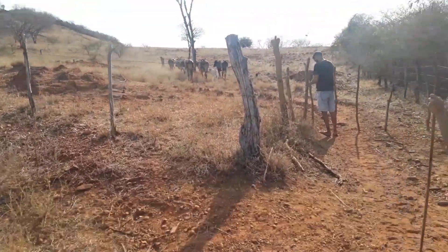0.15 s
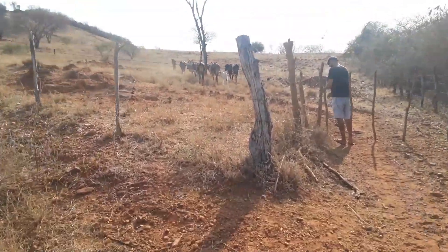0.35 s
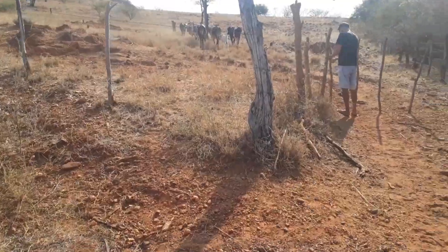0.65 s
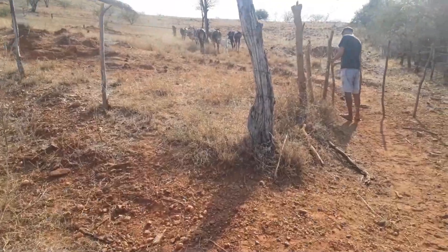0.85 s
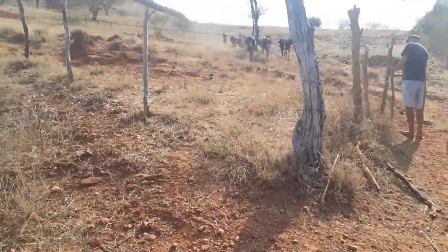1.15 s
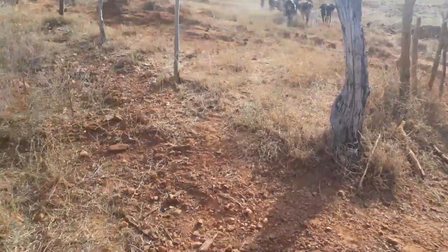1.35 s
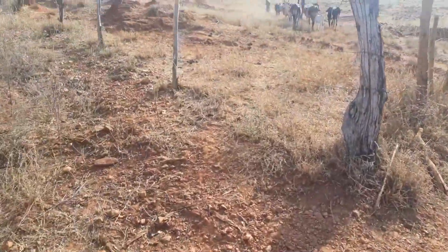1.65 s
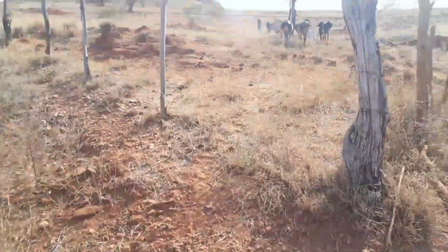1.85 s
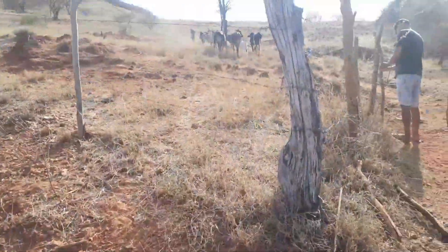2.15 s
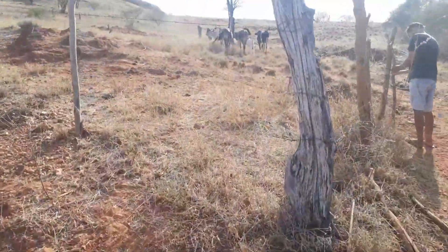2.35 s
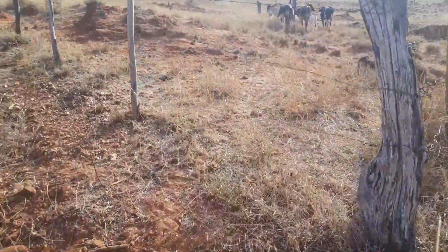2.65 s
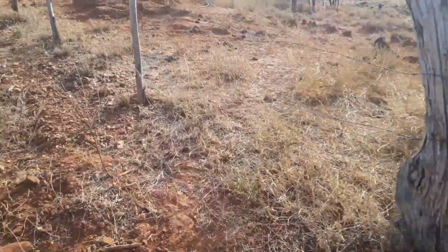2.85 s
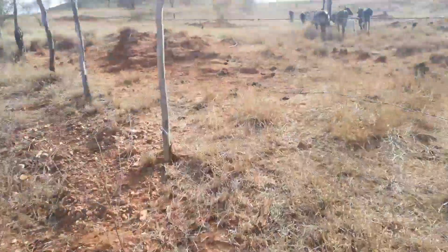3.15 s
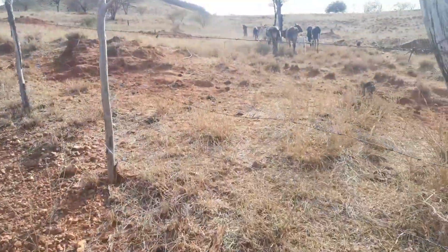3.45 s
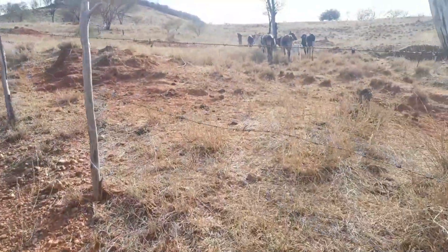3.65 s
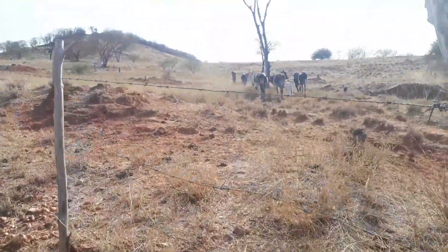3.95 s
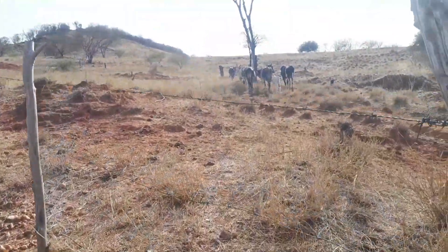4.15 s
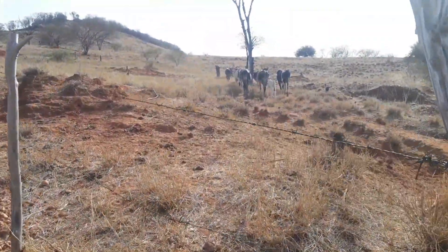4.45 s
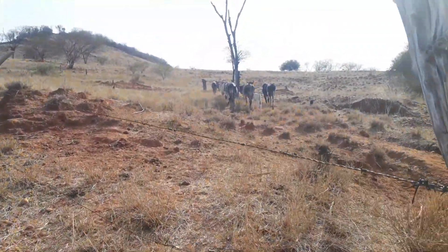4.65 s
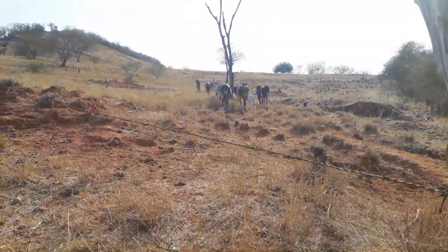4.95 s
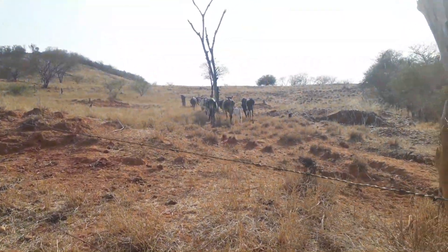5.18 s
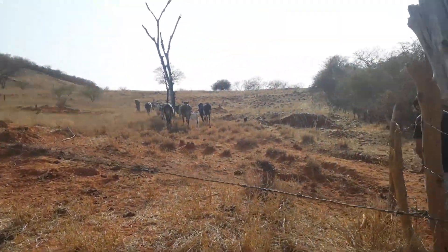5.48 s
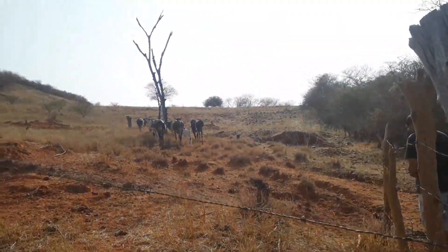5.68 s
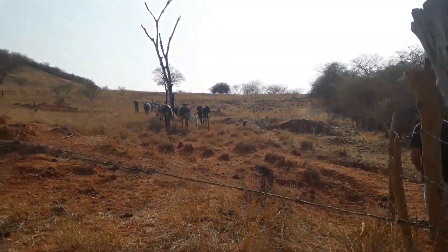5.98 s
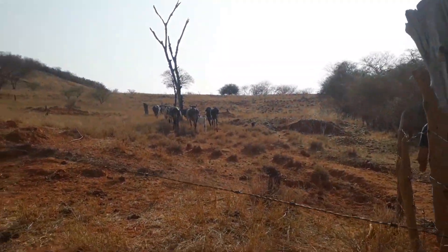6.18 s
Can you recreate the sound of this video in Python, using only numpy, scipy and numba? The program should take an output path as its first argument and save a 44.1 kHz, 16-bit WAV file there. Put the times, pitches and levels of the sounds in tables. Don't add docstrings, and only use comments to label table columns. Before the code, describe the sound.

Outdoors on a dry pasture, feet crunch straw and grit close to a hand-held phone, with wind puffs thumping it. After a quick sniff of breath, a cow starts a low nasal hum, cracks into a loud hoarse roar, then sinks to a groan. Stalks snap and twigs knock throughout; afterward only small crunches and faint ticks remain over a very faint hiss.

```python
import sys
import numpy as np
from scipy import signal
from scipy.fft import rfft, irfft
from scipy.io import wavfile
from scipy.ndimage import uniform_filter1d
from numba import njit

SR = 44100
rng = np.random.default_rng(int(sys.argv[2]) if len(sys.argv) > 2 else 0)


def volts_from_db(level):
    exponent = np.asarray(level, float) / 20
    return 10 ** exponent


def to_wav(sig):
    pcm = np.clip(np.atleast_2d(sig), -1, 1) * 32767
    pcm = np.round(pcm).astype(np.int16)
    wavfile.write(sys.argv[1], SR, pcm.T)


N = 278712


def unit(x):
    return x / np.sqrt(np.mean(x ** 2))


def track(table):
    s, *columns = np.transpose(table)
    return [np.interp(np.arange(N) / SR, s, c) for c in columns]


def ramp(span_s, start, end):
    return np.interp(np.arange(N) / SR, span_s, [start, end])


def gate(table, fade_s=.02):
    t = np.arange(N) / SR
    inside_s = np.minimum(t - table[0][0], table[-1][0] - t)
    return np.clip((inside_s + fade_s) / fade_s, 0, 1)


@njit
def svf(x, hz, width):
    y, b, l = np.empty(len(x)), 0., 0.
    for i in range(len(x)):
        g, k = np.tan(np.pi * hz[i] / SR), width[i] / hz[i]
        v = (b + g * (x[i] - l)) / (1 + g * (g + k))
        b, l, y[i] = 2 * v - b, l + 2 * g * v, k * v
    return y


def band(x, hz, width_hz):
    hz, width_hz = np.full(len(x), 1.) * hz, np.full(len(x), 1.) * width_hz
    return svf(svf(x, hz, width_hz), hz, width_hz)


def sway(hz, width_hz):
    return unit(band(rng.standard_normal(N), hz, width_hz))


def colour(x, spectrum):
    hz, db = np.transpose(spectrum)
    f = np.maximum(np.arange(N // 2 + 1) * SR / N, 1)
    return unit(irfft(rfft(x) * volts_from_db(np.interp(np.log(f), np.log(hz), db)), N))


def steady(x, span_s=.12):
    return x / np.sqrt(uniform_filter1d(x ** 2, int(span_s * SR)) + 1e-12)


def decay(x, tail_s):
    return signal.lfilter([1], [1, -np.exp(-1 / (tail_s * SR))], x)


def grains(rate_hz, spread_db, tail_s):
    size = (rng.random(N) < rate_hz / SR) * volts_from_db(spread_db * rng.exponential(size=N))
    return decay(size, tail_s) * rng.standard_normal(N)


def bursts(events, floor_db):
    t = np.arange(0, N / SR, 1 / 2000)
    power = volts_from_db(2 * floor_db)
    for s, db, rise_s, fall_s in events:
        drop_db = 20 * np.maximum((s - t) / rise_s, (t - s) / fall_s)
        power = power + volts_from_db(2 * (db - drop_db))
    return np.interp(np.arange(N) / SR, t, np.sqrt(power))


def ticks(events, sharp, tone):
    out, n = np.zeros(N + SR), 6000
    t = np.arange(n) / SR
    for s, db, hz, t60_s in events:
        hit = rng.standard_normal(n) * np.exp(-np.log(1000) * t / max(t60_s, .004))
        hit[0] += tone
        ring = band(hit, min(hz, .4 * SR), hz / sharp)
        start = int(s * SR)
        out[start:start + n] += volts_from_db(db) * ring / np.abs(ring).max()
    return out[:N]


def field():
    # Hz, dB per Hz
    hiss = [(24, -26), (70, -21), (200, -3), (585, 1.5), (800, -4), (1680, 0), (4570, -22), (16000, -37)]
    return colour(rng.standard_normal(N), hiss) * volts_from_db(-65)


def inhale():
    # time in seconds, level in dB
    breath = [
        (0.0, -51),
        (0.226, -50),
        (0.298, -43.5),
        (0.432, -65),
        (0.47, -66),
    ]
    # Hz, width in Hz, level in dB
    nostril = [(556, 190, -0.5), (1580, 107, 8.5), (2090, 134, 6), (2940, 47, 1), (3730, 500, -4),
               (6450, 180, -11.5)]
    air = rng.standard_normal(N)
    passages = sum(volts_from_db(db) * band(air, hz, 3.4 * width_hz) for hz, width_hz, db in nostril)
    return unit(passages) * volts_from_db(track(breath)[0] + 2.5) * gate(breath)


def stalks():
    # Hz, dB per Hz
    straw = [(1470, -31), (2500, 1.5), (3630, -2), (5970, -3), (8800, -0.5), (10700, -8.5), (14800, -6),
             (16000, -9)]
    # peak in seconds, level in dB, rise and fall in seconds per 20 dB
    rustles = [(.32, -46, .15, .022), (.42, -61.5, .1, .08), (.53, -61, .065, .7), (.74, -52, .07, .09),
               (.92, -54.5, .3, .08), (1.05, -54, .25, .04), (1.14, -52, .045, .5), (1.37, -51, .18, .035),
               (1.54, -59, .6, .05), (1.56, -43.5, .015, .04), (1.59, -54, .03, .15),
               (2.06, -62.5, .8, .13), (2.2, -46.5, .05, .085), (2.37, -63, .05, .2),
               (2.57, -60.5, .12, .2), (2.78, -52, .065, .04), (2.87, -58.5, .07, .24),
               (3.26, -56.5, .22, .025), (3.3, -66, .05, 2), (3.63, -47.5, .06, .02),
               (3.65, -58.5, .03, .7), (4.92, -64.5, 6, .06), (5.05, -59, .2, .09), (4.97, -61, .03, .06),
               (5.15, -63, .03, .2), (5.34, -66, .07, .1), (5.44, -62, .06, .04), (5.51, -63, .03, .4),
               (5.79, -59, .17, .055), (5.92, -61, .06, .05), (5.985, -59, .05, .04), (5.85, -68, .1, .3),
               (6.12, -68, .12, 1.5)]
    crackle = grains(700, 3.35, 0.0023) + 0.89 * rng.standard_normal(N)
    flicker_db = 1.4 * sway(6, 12)
    return steady(colour(crackle, straw), span_s=0.061) * bursts(rustles, -82) * volts_from_db(2.8 + flicker_db)


def grit():
    # peak in seconds, level in dB, rise and fall in seconds per 20 dB
    crunches = [(.86, -62, .8, .05), (.878, -48.5, .02, .27), (1.076, -54, .03, .015),
                (1.54, -59, 1.2, .05), (1.562, -41, .016, .04), (1.62, -45, .025, .04),
                (4.49, -47, .06, .1), (4.85, -51, .02, .05), (5.034, -50.5, .006, .11),
                (5.91, -54, .03, .07), (6.282, -72, .05, .15)]
    grinding = grains(530, 2.9, 0.0021) + .8 * rng.standard_normal(N)
    return steady(band(grinding, 1000, 2280), span_s=0.12) * bursts(crunches, -80) * volts_from_db(2.1)


def knocks():
    # start in seconds, peak in dB, centre in Hz, t60 in seconds
    struck = [(0.197, -33.5, 2090, 0.035), (0.318, -31, 1480, 0.037), (0.417, -42.5, 1950, 0.053),
              (0.594, -41, 1720, 0.021), (0.796, -39, 630, 0.045), (0.878, -32, 1510, 0.034),
              (0.966, -38.5, 576, 0.066), (1.073, -36.5, 2900, 0.019), (1.503, -40, 2170, 0.04),
              (1.555, -39, 1130, 0.033), (1.562, -33, 2650, 0.034), (1.612, -39, 1800, 0.078),
              (1.833, -34, 2500, 0.033), (2.214, -31, 1800, 0.055), (2.17, -37, 550, .15),
              (2.21, -35, 550, .15), (1.234, -42, 2500, .03), (5.745, -48, 2500, .02),
              (2.779, -25, 800, 0.04), (2.773, -33, 700, .03), (4.465, -32.5, 611, 0.05),
              (4.498, -32, 800, 0.12), (4.824, -38, 1167, 0.045), (4.964, -42.5, 805, 0.026),
              (5.051, -41, 1200, 0.04), (5.263, -39.5, 1210, 0.022), (5.557, -39.5, 1650, 0.023),
              (5.891, -43.5, 2300, 0.027), (5.956, -41.5, 1580, 0.09), (6.161, -46, 1300, 0.044),
              (6.265, -52, 1520, 0.024), (6.2825, -34, 1000, 0.02)]
    return ticks(struck, sharp=0.76, tone=2.8)


def snaps():
    # start in seconds, peak in dB, centre
    # in Hz
    snapping = [(.1984, -36, 4200), (.3183, -23.5, 8900), (.5176, -37, 6770), (.5796, -41.5, 7660),
                (.62, -40, 5160), (.7123, -38, 10500), (.9136, -39, 4750), (.9964, -36.5, 4930),
                (1.0386, -34, 7160), (1.1129, -43, 7470), (1.1957, -35, 8750), (1.235, -33, 8100),
                (1.5623, -34, 4100), (1.954, -35, 4430), (1.972, -35, 4160), (2.0255, -36, 4000),
                (2.1847, -24, 4360), (2.207, -29, 4510), (2.7548, -35, 4440), (2.7798, -35, 6610),
                (2.8723, -41, 8995), (2.9587, -40, 4110), (3.1655, -36.5, 7220), (3.226, -40, 6100),
                (3.4465, -41, 5670), (3.6069, -35.5, 4353), (3.6207, -35.5, 9505), (3.741, -42, 8753),
                (4.2816, -34.5, 8890), (1.1223, -38, 7300), (1.803, -42, 6000), (2.068, -38, 6000),
                (2.1296, -40, 4500), (2.172, -31, 4380), (2.563, -40, 3330), (2.636, -43, 4460),
                (2.7646, -33, 4460), (3.459, -42, 9500), (3.775, -40, 5000),
                (5.1488, -37.5, 8100), (5.3173, -49, 14200), (5.3374, -44, 7380), (5.421, -43, 13800),
                 (5.5573, -42, 4230), (5.6244, -45, 4040), (5.7453, -41, 14600), (5.781, -32, 12000),
                 (6.1617, -42, 7350), (6.2827, -44.5, 8000),
                (4.914, -41, 7000), (4.922, -40, 6000), (4.994, -45, 7780), (5.065, -41, 1280),
            (5.083, -43, 1280), (5.109, -46, 1170), (5.183, -45, 1680), (5.286, -51, 1360),
            (5.357, -48, 1760), (5.438, -45, 14100), (5.496, -49, 3020), (5.521, -46, 13000),
            (5.587, -49, 11000), (5.67, -50, 3350), (5.717, -50, 11000), (5.801, -43, 5000),
            (5.914, -44, 1070), (5.984, -46, 11000), (6.213, -51, 4000)]
    t60_s = .013
    return ticks([(*row, t60_s) for row in snapping], sharp=1.0, tone=1.9)


def wind():
    # peak in seconds, level in dB, rise and fall in seconds per 20 dB
    gusts = [(.4, -32.5, .13, .055), (.78, -52, .05, .18), (.92, -47, .17, .1), (1.09, -45, .2, .05),
             (1.21, -44, .08, .04), (1.32, -46, .06, .065), (1.43, -48.5, .1, .9), (2.08, -36, .19, .07),
             (2.2, -50, .2, 3), (2.8, -43, .1, .45), (3.65, -45, .1, .1), (4.06, -47, 4, .07),
             (4.3, -52, .1, .09), (4.55, -50, .07, .4), (6.04, -59, .45, .04), (6.14, -63, .05, .15),
             (6.28, -41, .016, .07)]
    # start in seconds, peak in dB, Hz, t60 in seconds
    puffs = [(0.288, -40, 96.9, 0.08), (0.335, -38, 290, 0.06), (0.355, -30, 190, 0.08),
             (0.378, -21, 117, 0.038), (0.417, -27.5, 118, 0.074), (0.764, -41.5, 85, 0.072),
             (0.915, -31, 86.1, 0.051), (1.125, -31, 83.4, 0.043), (1.157, -31, 86.1, 0.042),
             (1.205, -30, 95, 0.05), (0.8, -42, 85, 0.05), (1.294, -33.5, 70.0, 0.054),
             (1.324, -38, 75.4, 0.048), (2.049, -63, 170, 0.057), (2.789, -31.5, 84.5, 0.094),
             (2.851, -27, 194, 0.073), (6.133, -48, 90, 0.24), (6.147, -32.5, 74.4, 0.039),
             (6.189, -46, 86.1, 0.054), (6.285, -32, 94.2, 0.05)]
    turbulence = steady(band(rng.standard_normal(N), 92, 120), span_s=0.072)
    rumble = turbulence * bursts(gusts, -80) * volts_from_db(-6.5)
    out, u = np.zeros(N + SR), np.arange(SR // 3) / SR
    for s, db, hz, t60_s in puffs:
        swell = (1 - np.exp(-u / 0.0021)) * np.exp(-np.log(1000) * u / max(t60_s, .01))
        out[int(s * SR):][:len(u)] += volts_from_db(db) * np.sin(2 * np.pi * hz * u) * swell
    return rumble + out[:N]


def birds():
    # start in seconds, length in seconds, from Hz, to Hz, level in dB
    chirps = [
        (1.465, .025, 3000, 3350, -55),
        (4.701, .037, 2700, 4450, -49),
    ]
    out, t = 0, np.arange(N) / SR
    flutter = volts_from_db(4 * sway(160, 160))
    for s, length_s, hz0, hz1, db in chirps:
        u = np.clip((t - s) / length_s, 0, 1)
        hz = hz1 + (hz0 - hz1) * np.exp(-u / .2)
        swell = np.sqrt(np.abs(np.sin(np.pi * u)))
        out = out + volts_from_db(db) * swell * flutter * np.sin(2 * np.pi * np.cumsum(hz) / SR)
    lag = np.arange(SR // 6) / SR
    hedge = rng.standard_normal(len(lag)) * np.exp(-lag / .03)
    hedge = hedge / np.sqrt(np.sum(hedge ** 2))
    return out + volts_from_db(-8) * signal.fftconvolve(out, hedge)[:N]


def folds(hz, jitter):
    phase = np.cumsum(hz) / SR
    at = np.interp(np.arange(1, int(phase[-1])), phase, np.arange(N))
    chance = rng.standard_normal((len(at), 2))
    shake = jitter[at.astype(int)]
    at = np.clip(at + shake * chance[:, 0] * SR / hz[at.astype(int)], 0, N - 2)
    size, i = volts_from_db(6.7 * shake * chance[:, 1]), at.astype(int)
    pulses = np.zeros(N)
    np.add.at(pulses, i, size * (1 - at + i))
    np.add.at(pulses, i + 1, size * (at - i))
    return pulses


def larynx(hz, low_chaos, chaos, mouth):
    # delay in seconds, level in dB
    echoes = [(.0033, -16), (.0061, -15), (.0087, -18), (.019, -17)]
    clean = steady(folds(hz, .0015 + .015 * chaos))
    slaps = folds(1.1 * hz, np.full(N, .3))
    puff = decay(slaps, 0.016)
    turbulence = steady((puff + .4) * rng.standard_normal(N))
    hoarse = steady(steady(slaps) + 1.5 * turbulence, span_s=.05)

    def blend(c):
        return np.sqrt(1 - c) * clean + np.sqrt(c) * hoarse

    def echoed(v):
        return v + sum(volts_from_db(db) * np.roll(v, int(s * SR)) for s, db in echoes)

    high = blend(np.maximum(chaos, .55 * mouth))
    return blend(low_chaos), echoed(blend(chaos)), echoed(high), hoarse


def wander(chaos):
    return 1 + .013 * chaos * sway(7, 7)


def chest_tone(low, low_chaos, chaos, mouth):
    # time in seconds, Hz, width in Hz, shoulder in dB
    first = [(1.6, 225, 90, -3), (1.75, 235, 80, 1), (1.9, 245, 70, -1), (2.05, 255, 65, -5),
             (2.3, 245, 65, -8), (2.42, 235, 75, -10), (2.55, 248, 70, -11), (2.78, 262, 65, -12),
             (2.9, 240, 80, -11), (3.1, 258, 75, -12), (3.4, 268, 65, -12), (3.7, 265, 65, -11),
             (4.0, 250, 70, -7), (4.15, 240, 80, -14), (4.27, 262, 85, -16), (4.38, 228, 62, -16),
             (4.58, 208, 65, -14), (4.85, 190, 80, -12)]
    hz, width_hz, shoulder_db = track(first)
    shoulder = band(low, 162 + 60 * low_chaos, 62 + 15 * mouth)
    chest = band(low, hz * wander(chaos), width_hz) + volts_from_db(shoulder_db) * shoulder
    pocket_hz = np.full(N, 345.)
    return chest - svf(chest, pocket_hz, (.24 + .2 * mouth) * pocket_hz)


def throat(source, high, hoarse, chaos, mouth, sunk, pose):
    # time in seconds, second, third and fourth resonance in Hz, third in dB
    jaw = [(1.68, 620, 860, 1020, -6), (1.85, 630, 900, 1040, -3), (2.05, 590, 860, 1100, 3),
           (2.3, 560, 900, 1150, 4), (2.45, 550, 820, 1180, 7), (2.6, 580, 760, 1290, 10),
           (2.8, 600, 780, 1270, 8), (2.95, 640, 770, 1100, 6), (3.15, 640, 790, 1060, -1),
           (3.5, 612, 800, 1020, -3), (3.8, 615, 880, 1020, -3), (4.0, 620, 930, 1090, 1),
           (4.25, 575, 940, 1130, 2), (4.5, 590, 900, 1150, 4), (4.8, 560, 860, 1150, 2)]
    # Hz at onset, shut, half open, open, sunk
    tract = [(1450, 1430, 1480, 1560, 1450), (1900, 1860, 1830, 1810, 2000), (2200, 2300, 2170, 2270, 2200)]
    # width in Hz shut and open, level in dB shut and open
    shape = [(65, 68, 13.5, 10), (125, 120, 3, -3), (100, 143, 4.5, -6), (112, 150, 8.5, 0),
             (93, 115, 11, 0), (172, 260, 4.5, -2), (87.5, 120, -2, -3.5)]
    # dB at onset, shut, half open, open, sunk
    fourth_db = (1, -4, 2, 4, -1)
    fifth_db = (0, -10, -3, 7, -3)
    sixth_db = (1, 0, -7, 1, 3)
    # dB at onset, shut, half open, open, sunk
    pocket_db = (-14, -3, -6, -27, -11)
    leak_db = (-19, -12, -1, -18, -8)

    *jaw_hz, third_db = track(jaw)
    centres_hz = [hz * wander(chaos) for hz in [*jaw_hz, *(pose(row) for row in tract)]]
    ring = []
    for drive, hz, (shut_hz, open_hz, shut_db, open_db) in zip([source] * 2 + [high] * 4, centres_hz, shape[1:]):
        width_hz = (shut_hz + mouth * (open_hz - shut_hz)) * (1 + 1.2 * sunk * chaos)
        once = volts_from_db(shut_db + mouth * (open_db - shut_db)) * svf(drive, hz, width_hz)
        ring.append((1 - mouth) * once + mouth * svf(once, hz, width_hz))
    middle = band(ring[0], centres_hz[0], 400) - volts_from_db(pose(pocket_db)) * band(source, 450, 170)

    fifth_now_db = pose(fifth_db) - 12 * mouth * (1 - chaos)
    upper = volts_from_db(third_db) * ring[1] + volts_from_db(pose(fourth_db)) * ring[2] + volts_from_db(fifth_now_db) * ring[3]
    upper = upper + volts_from_db(pose(sixth_db)) * ring[4] + volts_from_db(-1.5 * mouth) * ring[5]
    upper = upper + volts_from_db(pose(leak_db)) * np.roll(hoarse, SR // 20)
    upper = signal.sosfilt(signal.butter(4, [540, 2550], "band", fs=SR, output="sos"), upper)
    return middle, upper + volts_from_db(-20 - 4 * mouth) * band(source, 2650, 400)


def rasp(high, hoarse, mouth):
    # Hz, width in Hz, level in dB
    edges = [(3380, 280, 1), (3680, 280, 1), (4200, 300, -4), (4550, 400, -8), (6100, 350, -17),
             (6900, 400, -16), (7600, 400, -18)]
    breathy = np.sqrt(1 - .12) * high + np.sqrt(.12) * hoarse
    out = 0
    for k, (hz, width_hz, db) in enumerate(edges):
        level_db = db + 2.2 * sway(2.5, 2.5) + 2.5 * mouth * hz / 1000
        out = out + (-1) ** k * volts_from_db(level_db) * band(breathy, hz * (1 + .02 * sway(2.5, 2.5)), width_hz)
    return out


def cow():
    # time in seconds, fold rate in Hz, chest level in dB, nose and mouth level in dB
    hum = [(1.58, 71.6, -55, -56), (1.65, 74, -44, -47), (1.85, 80.5, -46, -40), (1.99, 84.4, -42, -38),
           (2.1, 86.2, -38.5, -40), (2.18, 85, -36.5, -43), (2.3, 82.7, -36.5, -43), (2.41, 76.8, -36, -44)]
    breaking = [(2.46, 70.7, -39, -45), (2.52, 68, -40, -46), (2.69, 66, -36, -47), (2.76, 67, -37.5, -47),
                (2.84, 70, -42, -47), (2.94, 80, -33.5, -41.5), (3.07, 91, -34, -39.5)]
    roar = [(3.14, 93, -29, -39), (3.2, 95, -33, -38), (3.29, 97, -29, -37), (3.35, 95, -30, -37),
            (3.43, 92, -26, -35), (3.55, 90, -27, -35), (3.6, 89, -30, -38), (3.67, 88, -27.5, -37),
            (3.73, 87, -35, -39)]
    ease = [(3.8, 86.5, -31.5, -38), (3.98, 84, -32, -39), (4.15, 80, -35, -41), (4.21, 77, -29, -42),
            (4.28, 75, -28, -43), (4.32, 75, -33, -45)]
    groan = [(4.345, 75.5, -41, -51), (4.44, 73.5, -32, -51), (4.48, 73, -35, -49), (4.52, 73, -31.5, -49),
             (4.585, 72, -34, -52), (4.615, 71, -44, -53), (4.69, 69, -41, -55), (4.82, 67, -49, -56),
             (4.9, 69, -72, -66)]
    # time in seconds, chaos in the chest, chaos in the mouth, mouth opening (all 0-1)
    strain = [
        (1.6, .05, .15, 0),
        (1.7, .01, .04, 0),
        (2.15, .01, .06, 0),
        (2.45, .35, .65, .28),
        (3.05, .8, .8, 1),
        (3.8, .7, .7, 1),
        (4.06, .45, .1, 1),
        (4.28, .45, .15, 1),
        (4.38, .5, .85, .75),
    ]
    sink_s = (3.75, 4.9)
    settle_s = (1.8, 2.05)
    bright_s = (1.64, 1.706)
    # dB shut, change in dB when open, change in dB when open and steady
    second = (-9.5, 4.5, 12)
    harsh = (-10.5, -9, -7)
    # peak in seconds, gain in dB, rise and fall in seconds per 20 dB
    accents = [(3.06, 2, .02, .06), (3.1, 3, .015, .05), (3.187, 5, .01, .07), (3.287, 4, .015, .07),
               (3.373, 5, .01, .07), (3.45, 4, .015, .06), (3.518, 5, .01, .06), (3.562, 3, .015, .06),
               (3.665, 2, .02, .06), (3.8, 2, .02, .06), (3.93, 2, .02, .06), (3.995, 2, .02, .06)]
    # peak in seconds, level in dB, rise and fall in seconds per 20 dB, Hz, width in Hz
    parting = (1.635, -45, .04, .12, 335, 150)

    call = hum + breaking + roar + ease + groan
    hz, chest_db, mouth_db = track(call)
    low_chaos, chaos, mouth = track(strain)
    sunk, settled = ramp(sink_s, 0, 1), ramp(settle_s, 0, 1)

    def pose(p):
        return np.interp(mouth + settled - 1, [-1, 0, .6, 1], p[:-1]) * (1 - sunk) + p[-1] * sunk

    def opened(levels):
        shut_db, open_db, steady_db = levels
        return upper_db + shut_db + mouth * (open_db + steady_db * (1 - chaos))

    upper_db = mouth_db - chest_db
    low, source, high, hoarse = larynx(hz, low_chaos, chaos, mouth)
    chest = chest_tone(low, low_chaos, chaos, mouth)
    middle, upper = throat(source, high, hoarse, chaos, mouth, sunk, pose)
    sigh = volts_from_db(upper_db - 6) * sunk ** 2 * chaos * steady(band(hoarse, 2600, 2500))

    through_mouth = volts_from_db(opened(second) - sunk) * steady(middle)
    through_mouth = through_mouth + volts_from_db(upper_db) * steady(upper) * bursts(accents, -1.5)
    through_mouth = through_mouth + volts_from_db(opened(harsh) - 3 * settled) * steady(rasp(high, hoarse, mouth), span_s=.4)
    voice = steady(chest, span_s=.06) + ramp(bright_s, .25, 1) * (through_mouth + sigh)
    shudder_db = 1.5 * low_chaos * sway(35, 30)
    lips = steady(band(source, *parting[4:])) * bursts([parting[:4]], -95)
    return (voice * volts_from_db(chest_db + shudder_db) + lips) * gate(call)


def twigs():
    # start in seconds, peak in dB, centre in Hz, t60 in seconds
    hollow = [(1.69, -44, 4200, .15), (2.245, -42, 4400, .08), (1.614, -37, 1130, .07),
              (1.833, -27, 1330, .04), (1.885, -34, 1250, .05), (1.953, -34, 1300, .04),
              (1.972, -35, 1100, .04), (2.214, -27, 1250, .07), (2.233, -31, 2560, .04),
              (2.3, -36, 1250, .04), (2.3, -37, 2560, .03), (2.779, -28, 2500, .05),
              (4.482, -39, 1900, .04), (4.465, -39, 1700, .04), (4.834, -42, 1150, .05)]
    return ticks(hollow, sharp=3.0, tone=4.0)


def scene():
    feet = stalks() + grit() + knocks() + snaps() + twigs()
    return (field() + inhale() + feet + wind() + birds() + cow())[None]


def top_cut(x):
    return signal.sosfilt(signal.butter(12, 16510, fs=SR, output="sos"), x)


def record(dry):
    bass = signal.sosfilt(signal.butter(2, 55, "high", fs=SR, output="sos"), dry)
    top = signal.sosfilt(signal.ellip(6, .3, 45, 15500, fs=SR, output="sos"), bass)
    mix = top - .0006
    return top_cut(mix)


dry = scene()
out = record(dry)
to_wav(out)
```